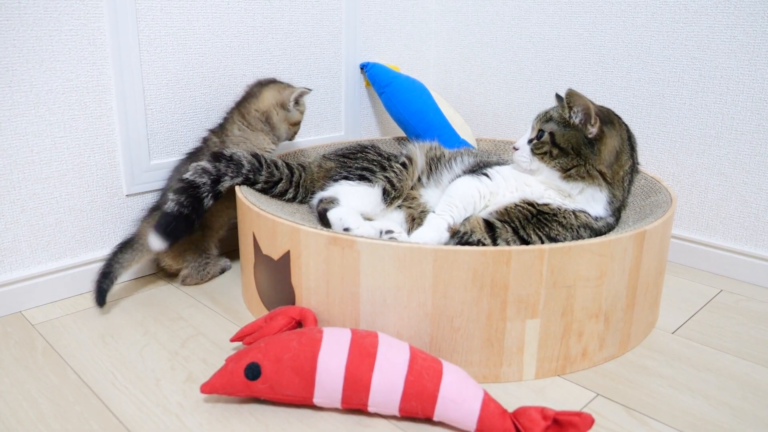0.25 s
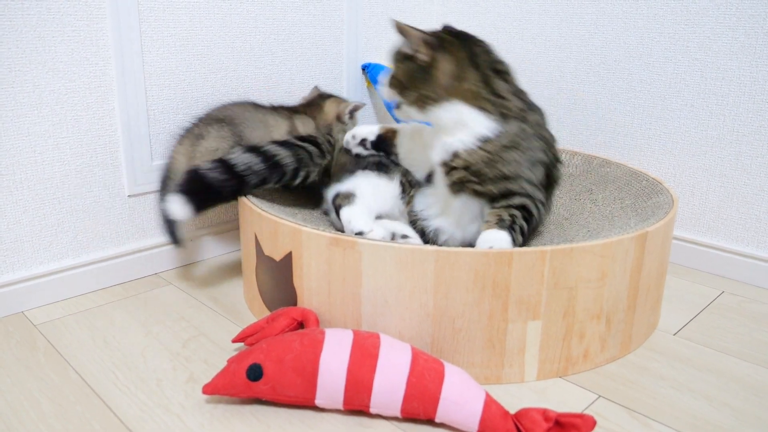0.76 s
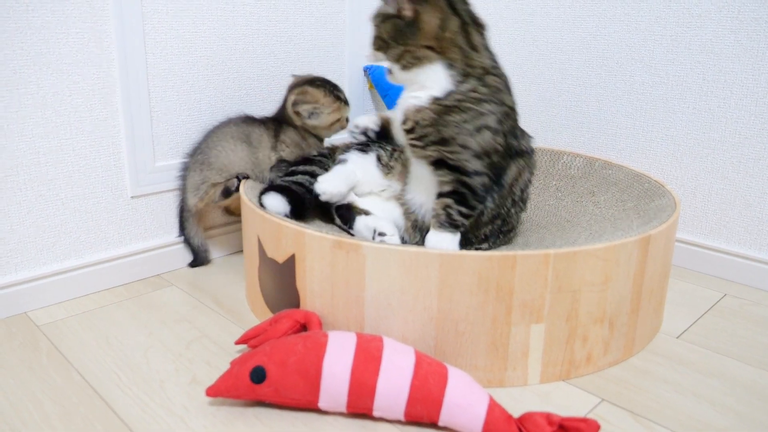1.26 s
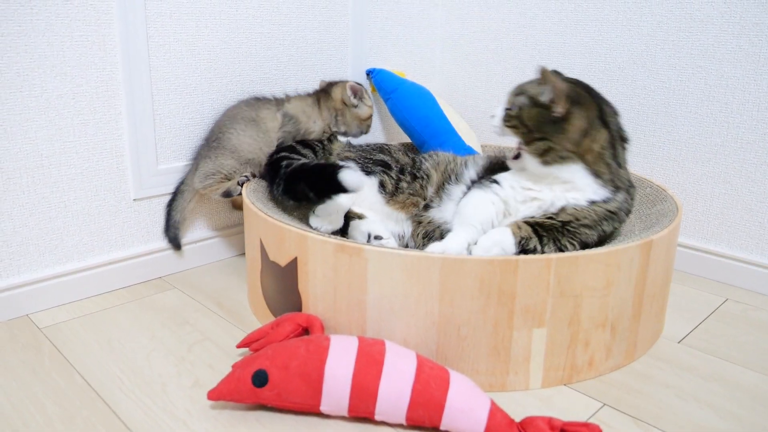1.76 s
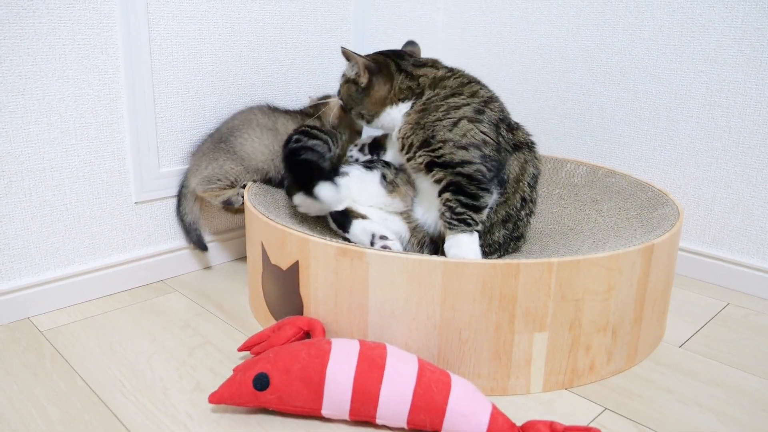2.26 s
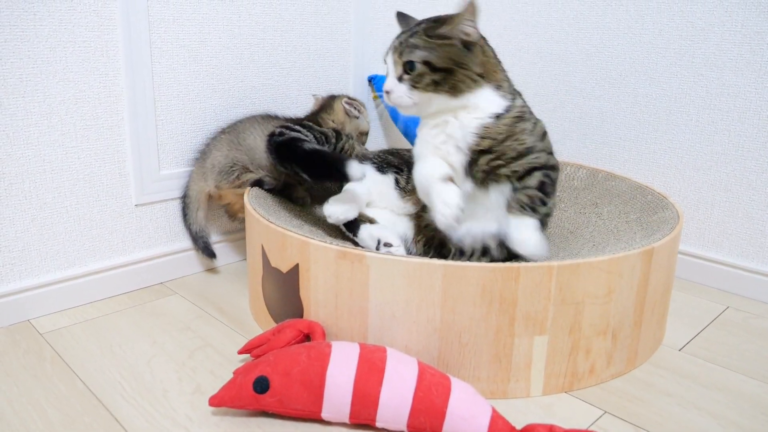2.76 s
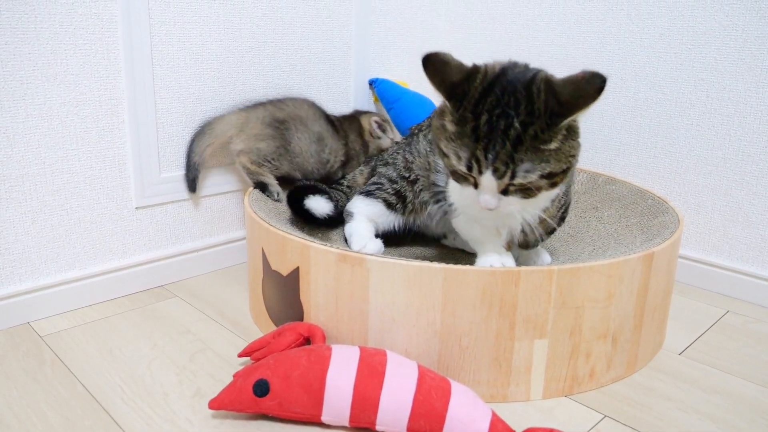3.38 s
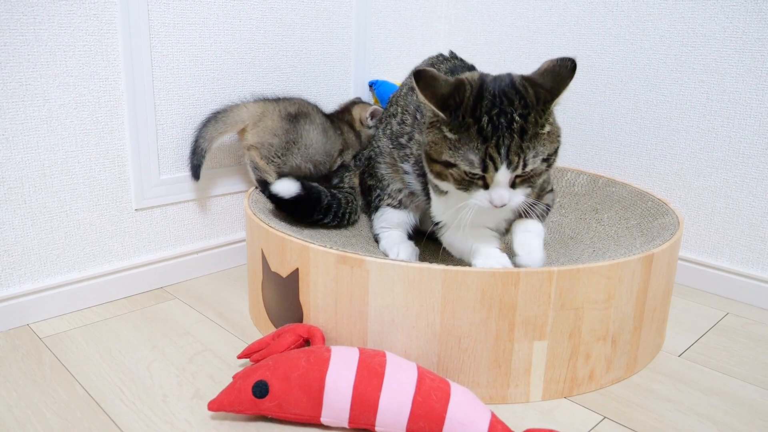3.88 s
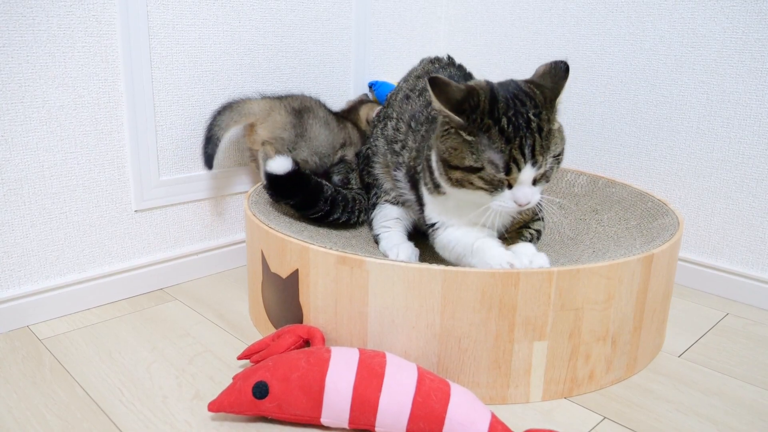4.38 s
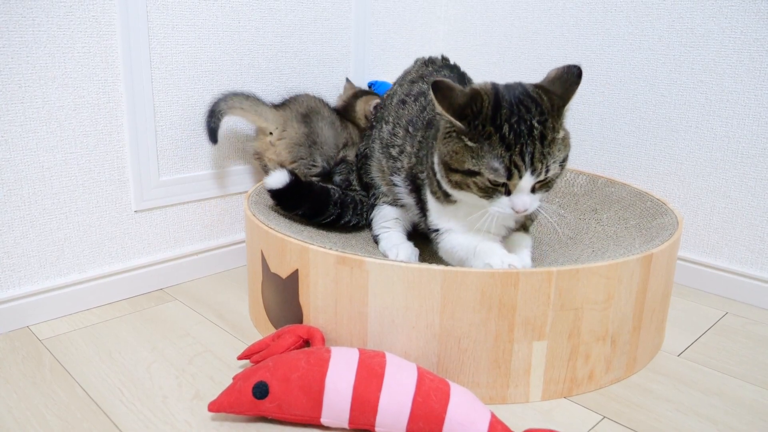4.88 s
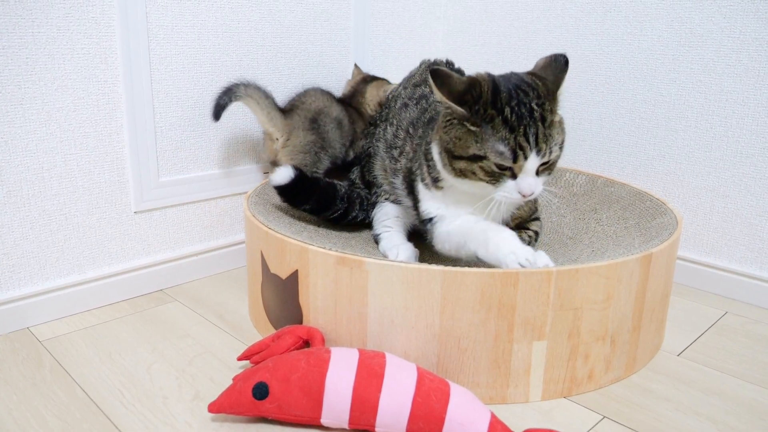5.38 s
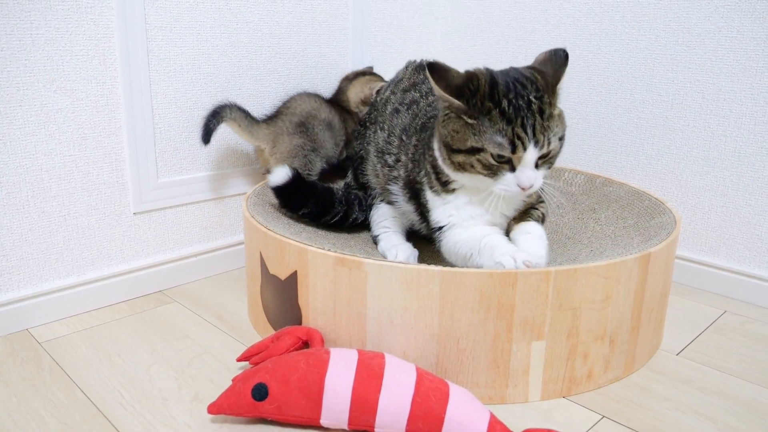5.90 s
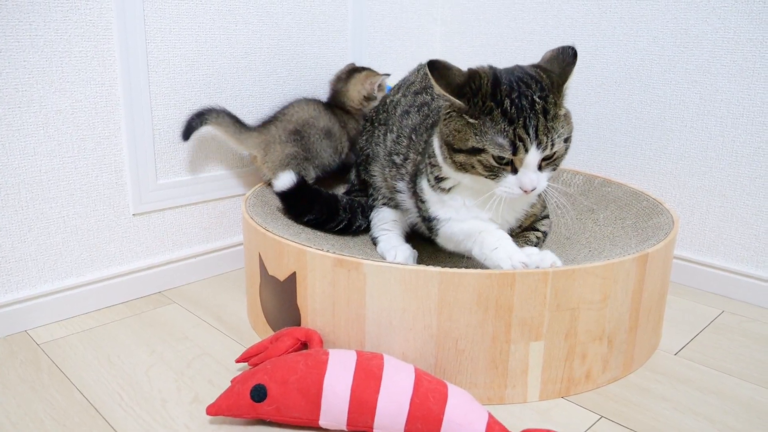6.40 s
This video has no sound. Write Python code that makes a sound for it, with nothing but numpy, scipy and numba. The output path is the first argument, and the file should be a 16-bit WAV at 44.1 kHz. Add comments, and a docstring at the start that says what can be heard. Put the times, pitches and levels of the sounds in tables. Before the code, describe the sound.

Two cats scuffle on a hollow cardboard scratcher: soft thuds, a rough strained cry, a wet hiss, a tiny mew, then harder claw rips.

```python
"""Faint room tone, then paws thudding and fur rustling: a kitten and a grown cat tussle on a round
cardboard scratching bed in a small, bare room. A rough cry breaks into spitting puffs; a wet hiss, a tiny mew follow.
Then claws snag harder: fibres tear as filtered noise, and the hollow bed rings as damped modes.
Voices are harmonics and noise through moving resonances; dense noise tails make the echoes."""
import sys
import numpy as np
from scipy import signal
from scipy.fft import rfft, irfft
from scipy.io import wavfile
from scipy.ndimage import uniform_filter1d
from numba import njit

SR = 44100
rng = np.random.default_rng(int(sys.argv[2]) if len(sys.argv) > 2 else 0)


def master(y):
    """Save y as 16-bit WAV."""
    cut = np.clip(np.atleast_2d(y).T, -1, 1)
    pcm = np.round(cut * 32767)  # scale
    wavfile.write(sys.argv[1], SR, pcm.astype(np.int16))


N = 293265
TIME = np.arange(N) / SR

# Table levels are before the trims that their functions add.
# spectrum of the still air: hz, level_db
AIR_SPECTRUM = [(18, -103), (30, -58), (64, -25), (102, -1), (129, -17), (304, -11.5), (337, -22.5),
                (374, -17), (437, -15.5), (794, -15.5), (2130, -26.5), (3230, -28), (3780, -35),
                (12200, -39), (15000, -40)]
AIR_DB = -70
# the room's answer by band: hz, t60_s, echo_db, side_over_mid_db
ROOM_BANDS = [(108, 0.46, -6.5, -35), (254, 0.31, 3.5, -24.5), (645, 0.41, 2, -13.5), (1800, 0.5, -5, -4),
              (4430, 0.49, -1, -6), (12000, 0.34, -1, -5)]

# bodies sliding on the cardboard: peak_s, rise_s, fall_s, rub_db, fur_db
SLIDES = [(0.725, 0.058, 0.051, -58, -61.5), (0.85, 0.031, 0.18, -67, -69.5), (1.04, 0.045, 0.05, -58, -61),
          (1.232, 0.042, 0.18, -59, -88), (1.63, 0.028, 0.1, -66, -71.5), (2.14, 0.13, 0.32, -55, -57),
          (3.12, 0.26, 0.12, -65, -70), (3.59, 0.12, 0.05, -67, -71.5), (3.85, 0.053, 0.022, -65, -92),
          (4.38, 0.2, 0.026, -59, -69)]
# spectra of fur crackle and of dull rubbing: hz, level_db
FUR_SPECTRUM = [(700, 1.5), (1500, 15.5), (2800, 6.5), (4500, -0.5), (6500, 1), (9000, -0.5), (12000, -7),
                (15000, -5)]
RUB_SPECTRUM = [(70, -66.5), (150, 7), (300, -0.5), (550, 2), (900, 2), (1600, -23), (3500, -51.5)]
# the cats are never quite still
STIR_FROM_S, STIR_RUB_DB, STIR_FUR_DB, STIR_UNEVEN_DB = 0.65, -69.5, -76.5, 3

# paw falls: start_s, thump_db, knock_db, bed_pitch_ratio
PAW_FALLS = [(0.646, -50, -52, 1.8), (0.704, -44.5, -64, 0.74), (0.762, -37, -51.5, 0.9),
             (0.824, -46, -54.5, 1.13), (1.226, -55, -64, 1.4), (1.331, -53, -66, 1.6),
             (1.586, -46.5, -80, 0.59), (1.659, -53, -59, 0.85), (1.78, -48, -76, 0.87),
             (2.859, -44, -58.5, 1.1), (2.92, -54, -57.5, 0.62), (3.08, -47.5, -50, 1.38),
             (3.16, -44.5, -76, 1.12), (3.227, -51.5, -76, 1.2), (3.571, -52, -56, 1.33),
             (3.744, -54, -55, 1.28), (3.827, -44.5, -55.5, 1.24), (4.233, -44, -47.5, 1.28),
             (4.752, -45, -46, 0.86), (5.67, -40, -43, 1.06), (6.275, -48, -78, 1.33),
             (6.521, -38.5, -34.5, 0.74)]
# light claw-tip ticks on the ribs: start_s, level_db, pitch_ratio
CLAW_TICKS = [(0.647, -64, 0.53), (1.007, -54, 1.1), (2.982, -58, 0.51), (3.079, -57, 0.5),
              (3.41, -64, 1.07), (3.478, -65, 0.82), (3.571, -77, 0.57), (3.744, -57.5, 0.85),
              (3.836, -70, 1.1), (3.895, -65, 0.8), (4.234, -52.5, 0.65), (5.31, -46, 0.58)]

# wet smacks of the mouth: start_s, level_db
SMACKS = [(2.853, -53.5), (2.869, -57.5)]
# modes of a smack: hz, level_db, t60_s
SMACK_MODES = [(1230, 10, 0.012), (1520, -25, .014), (3900, 1, 0.018), (7400, 13, 0.0064)]
# faint thin squeaks: start_s, length_s, centre_hz, level_db
SQUEAKS = [(5.484, 0.087, 3605, -77), (5.946, 0.075, 2214, -68.5), (6.425, 0.086, 3120, -72.5)]

# closed-mouth mew: time_s, pitch_hz, level_db
MEW_CONTOUR = [(2.566, 291.4, -72), (2.577, 382, -53), (2.587, 464, -46.5), (2.594, 496, -45),
               (2.602, 424, -48), (2.612, 334, -84)]
# harmonics of the mew, from the fundamental up: level_db
MEW_HARMONICS = [2.5, 0.5, -21, -34]

# the hiss: time_s, throat_db, teeth_db, jaw_hz, tongue_hz, tongue_db
HISS_CONTOUR = [(1.77, -75, -73, 930, 2460, -15), (1.94, -56, -65, 1060, 2480, -21),
                (2.03, -52, -59, 1110, 2570, -2), (2.1, -58.5, -63.5, 1140, 2920, 13),
                (2.16, -57.5, -55.5, 1170, 2900, 10), (2.26, -63.5, -65, 740, 1830, 17.5),
                (2.35, -57, -56, 700, 2160, 12), (2.41, -67.5, -65, 746, 2450, 20),
                (2.46, -65.5, -76, 890, 2850, 21.5), (2.52, -70, -62, 1000, 3400, 8),
                (2.6, -72, -70.5, 1000, 3270, 13)]
# whistly hiss resonances at palate, tooth edge and tooth gap:
# time_s, palate_hz, palate_db, edge_hz, edge_db, gap_hz, gap_db
HISS_WHISTLES = [(1.8, 4100, -7, 6550, 5, 9250, 10), (1.95, 4600, -12, 7000, -2, 10200, -4),
                 (2.06, 4700, -3, 6800, 0, 9850, 6), (2.15, 3400, -11, 8240, 7, 10000, 13),
                 (2.24, 3500, -1, 7260, -11, 9300, -1), (2.3, 3900, 4, 5440, -4, 8100, -8),
                 (2.37, 3940, -3, 6040, 6, 7500, 1), (2.44, 4020, 5, 6200, 3, 7300, -8),
                 (2.51, 5170, 3, 7300, -5, 11100, 11), (2.58, 4600, 3, 7100, -2, 9800, -2)]
# spectra of air in the throat and at the teeth: hz, level_db
THROAT_SPECTRUM = [(300, -30), (700, -4.5), (1300, 4), (1900, -4.5), (2900, -8.5), (3800, -20), (5000, -44),
                   (8000, -16.5)]
TEETH_SPECTRUM = [(2500, -5.5), (3400, 4.5), (4300, 0.5), (5100, 0.5), (5900, -2), (7500, 0), (8700, -9),
                  (9900, -15), (11000, -15), (15000, -5)]

# effort of the cry: time_s, level_db
CRY_EFFORT = [(1.004, -64), (1.043, -47), (1.076, -56), (1.1, -42.5), (1.13, -41), (1.158, -38),
              (1.195, -39.5), (1.236, -31.5), (1.248, -44), (1.264, -40.5), (1.279, -32), (1.305, -39.5),
              (1.332, -45.5), (1.36, -31.5), (1.376, -29.5), (1.39, -37), (1.41, -41.5), (1.418, -38),
              (1.44, -50)]
# melody of the cry: time_s, pitch_hz
CRY_PITCH = [(1.004, 540), (1.045, 492.4), (1.06, 527), (1.08, 470.4), (1.098, 501.5), (1.121, 455),
             (1.143, 497.2), (1.161, 477.2), (1.18, 544.3), (1.198, 479.3), (1.217, 536.2), (1.24, 487),
             (1.263, 449), (1.278, 484.6), (1.308, 544.5), (1.332, 461), (1.348, 516.7), (1.366, 475),
             (1.38, 495.8), (1.394, 449.4), (1.408, 494), (1.435, 455)]
# mouth shape of the cry: time_s, low_hz, mid_hz, mid_over_low_db, top_hz, top_over_low_db
CRY_MOUTH = [(1.04, 1800, 2740, -4, 3000, -29), (1.08, 1770, 2720, 2, 2980, -30),
             (1.118, 1700, 2650, 8, 3100, -21), (1.155, 1850, 2770, 1.5, 3340, -6.5),
             (1.2, 1700, 2740, -11, 3800, -6.5), (1.24, 1480, 2400, -34, 4000, -17),
             (1.26, 1480, 2280, -5, 4100, 7), (1.283, 1520, 2380, 17, 4030, 0.5),
             (1.325, 1370, 2310, 13.5, 3370, -10), (1.365, 1940, 2270, 14.5, 3460, -1),
             (1.388, 1840, 2600, 13, 3660, 7), (1.405, 1370, 2470, 9.5, 3630, -1),
             (1.42, 1390, 2380, 13.5, 3450, -8)]
# roughness of the cry: time_s, pitch_jitter_share, rasp_0_to_1
CRY_ROUGHNESS = [(1.03, .03, .55), (1.1, .01, .22), (1.24, .01, .17), (1.28, .018, .34), (1.32, .035, .6),
                 (1.365, .012, .27), (1.39, .025, .5), (1.42, .02, .35)]
# spectra of the voice before the mouth, and of what passes beside its resonances: hz, level_db
CRY_FOLDS_SPECTRUM = [(200, -1.5), (480, 3), (1000, 3.5), (2000, 2.5), (3000, 0.5), (4200, -11),
                      (5200, -24), (9000, -12)]
CRY_THROAT_SPECTRUM = [(250, -32), (500, -4.5), (1000, 4), (2000, 3), (3000, -28), (3600, -12), (6000, -5),
                       (12000, -18)]
# spectrum of leaking air: hz, level_db
SPIT_SPECTRUM = [(900, -24), (2000, -7), (2250, 0), (2400, 9), (2560, -1), (2900, 1), (3900, -8),
                 (6000, -13.5), (8000, -23), (13000, -39)]
SPIT_DB = -21  # relative to the effort of the voice
# spitting puffs that break off the cry: peak_s, rise_s, fall_s, level_db
PUFFS = [(1.261, 0.014, 0.0081, -54.5), (1.473, 0.029, 0.037, -49.5)]

# claw snags: start_s, snap_db, thump_db, wall_flex_db, pad_knock_db, rim_clack_db, tear_db,
# snap_centre_hz, pad_pitch_ratio, pad_ring_ratio
SNAGS = [(0.658, -74, -66, -59, -51.5, -65, -79, 1300, 1, 0.62),
         (2.234, -54, -59, -51.5, -52, -64, -72, 1390, 1.27, 1),
         (4.104, -40, -51, -48.5, -40.5, -40, -46.5, 1700, 0.88, 1.1),
         (4.341, -54, -60, -56.5, -43.5, -69, -48.5, 1800, 1.02, 0.54),
         (4.739, -57, -50, -49.5, -45, -64, -59, 1290, 0.91, 1.1),
         (4.9013, -33, -34.5, -41, -29, -55, -42.5, 1430, 0.98, 1.03),
         (5.142, -56, -57, -65, -55, -68, -55, 1410, 0.94, 0.76),
         (5.279, -39, -42, -41.5, -33.5, -37.5, -50, 1830, 1.03, 1.1),
         (5.31, -67, -45.5, -64, -37.5, -48, -73, 1300, 0.89, 0.93),
         (5.558, -38.5, -56, -65, -40.5, -54, -48.5, 2320, 1.07, 0.7),
         (5.59, -49.5, -58, -54, -48, -52, -50.5, 1760, 0.91, 1.3),
         (5.679, -43.5, -43.5, -41, -32.5, -51, -41, 1580, 0.91, 0.64),
         (5.85, -40, -37, -50, -31, -44, -49, 1590, .99, 1.4),
         (6.1229, -33.5, -54, -53.5, -43.5, -42, -44, 1850, 0.97, 0.86),
         (6.2977, -41.5, -37.5, -56, -37.5, -46, -36.5, 1700, 1, 0.58),
         (6.5003, -25, -33.5, -41, -32.5, -34.5, -34, 2030, 0.87, 0.93),
         (6.5121, -24, -34.5, -38.5, -32, -36, -26, 1860, 1.18, 0.6),
         (6.525, -41, -35.5, -44.5, -39, -54, -39, 1300, 0.93, 0.69)]
# modes of the hollow bed, wall, rim, pad on the bed, and paper ribs: hz, level_db, t60_s
BED_MODES = [(119.8, -2, 0.18), (156.2, 12, 0.058), (177, -7.5, 0.13)]
WALL_MODES = [(256, -6, 0.034), (425, -11, 0.025)]
RIM_MODES = [(630, -8.5, 0.028), (930, -3.5, 0.032)]
PAD_MODES = [(360, -37, 0.024), (481, -16, 0.15), (553.4, 17, 0.032), (624, -41, 0.069), (786, -7.5, 0.13)]
RIB_MODES = [(1316, 8, 0.018), (1620, 13.5, 0.0093), (2015, 4.5, 0.012), (2380, -0.5, 0.0085),
             (2540, -4.5, 0.014), (3950, -15, 0.01)]
# spectrum of tearing fibres: hz, level_db
FIBRE_SPECTRUM = [(600, -46.5), (2000, 4), (4200, 3.5), (5600, 0), (8500, -1.5), (10500, -3.5),
                  (13000, -16), (15500, 7.5)]
# a strong snag; the slip time halves for every SLIP_HALVES_DB of louder snap
SNAP_DB, SLIP_S, SLIP_HALVES_DB = -28, 0.00086, 18
# claws drag on after each snag: levels after a strong snag, dB gained per dB of snap, timing of the swell
DRAG_RUB_DB, DRAG_FUR_DB, DRAG_FOLLOWS = -51, -66, 0.45
DRAG_LAG_S, DRAG_RISE_S, DRAG_FALL_S = 0.0075, 0.011, 0.11
RIB_TOP_HZ = 2900  # the ribs radiate little above this
TOP_HZ = 15300  # steep upper limit of the recorder


def undb(db):
    """Decibels to gain."""
    return 10 ** (np.asarray(db) / 20)


def unit(x):
    """Scale to rms 1."""
    return x / np.sqrt(np.mean(x ** 2))


def curves(rows):
    """Every column of a timed table, sample by sample."""
    s, *columns = np.transpose(rows)
    return [np.interp(TIME, s, c) for c in columns]


def during(rows):
    """A soft gate, open while a table lasts."""
    is_open = (TIME > rows[0][0]) & (TIME < rows[-1][0])
    return uniform_filter1d(1. * is_open, size=300)


def over_hz(rows, size):
    """Every column of a spectral table on the bins of a transform, along log frequency."""
    hz, *columns = np.transpose(rows)
    bins = np.log(np.fft.rfftfreq(size, 1 / SR) + 1)
    return [np.interp(bins, np.log(hz), c) for c in columns]


def colour(x, points):
    """Causal minimum-phase filter with the given spectrum."""
    size = 8192
    cepstrum = irfft(np.log(undb(over_hz(points, size)[0])))
    # folding the cepstrum forward puts the response after its cause
    cepstrum[1:size // 2] *= 2
    cepstrum[size // 2 + 1:] = 0
    response = irfft(np.exp(rfft(cepstrum)))
    return signal.fftconvolve(x, response)[:len(x)]


def noise(points, grain_db=0):
    """Coloured noise of rms 1; uneven sizes, held for 16 samples each, make it grainy."""
    grains = np.minimum(rng.exponential(size=N // 16 + 1), 4)
    sizes = np.repeat(undb(grain_db * grains), 16)[:N]
    return unit(colour(rng.standard_normal(N) * sizes, points))


def walk(rate_hz):
    """Random wander of rms 1, joining this many random points per second."""
    return unit(np.interp(TIME * rate_hz, np.arange(N), rng.standard_normal(N)))


def pops(per_s):
    """Sparse random impulses of uneven size; rms 1."""
    return unit((rng.random(N) < per_s / SR) * rng.standard_normal(N))


def swell(s, rise_s, fall_s):
    """A rounded rise to 1 and a rounded fall."""
    return np.exp(-((TIME - s) / np.where(TIME < s, rise_s, fall_s)) ** 2)


def push(rise_s):
    """A contact force that swells and lets go."""
    t = TIME[:SR // 5] / rise_s
    return t * np.exp(-t)


@njit
def resonate(x, hz, width_hz):
    """Band-pass with a moving centre."""
    y, band, low = np.empty(len(x)), 0., 0.
    for i in range(len(x)):
        g, k = np.tan(np.pi * hz[i] / SR), width_hz / hz[i]
        v = (band + g * (x[i] - low)) / (1 + g * (g + k))
        band, low, y[i] = 2 * v - band, low + 2 * g * v, k * v
    return y


def ring(force, modes):
    """Damped modes driven by a force."""
    t = TIME[:len(force)]
    response = sum(undb(db - 60 * t / t60) * np.cos(2 * np.pi * hz * t) for hz, db, t60 in modes)
    return signal.fftconvolve(force, response)[:len(force)]


def retune(modes, pitch, ring_time=1):
    """Scale the pitch and ring time of the modes, with a little random scatter in pitch and level."""
    scatter, scatter_db = 0.018, 1.5
    return [(hz * pitch * (1 + scatter * rng.standard_normal()),
             db + scatter_db * rng.standard_normal(),
             t60 * ring_time) for hz, db, t60 in modes]


def add(track, s, x, db):
    """Mix in a sound whose loudest 10 ms have the given level."""
    i = int(s * SR)
    x = x * undb(db) / np.sqrt(uniform_filter1d(x ** 2, size=441).max())
    track[i:i + len(x)] += x[:N - i]


def stereo(mid, side):
    """Mid and side to left and right."""
    return np.array([mid + side, mid - side])


def still_air(side_db=-84):
    """Room tone: faint, nearly steady coloured noise with a quieter independent side signal."""
    side = noise([(60, -5.0), (300, -9.5), (1000, -1.5), (3000, -6.0),
                  (6000, -12.5), (12000, -15), (14000, -32.0)])
    return stereo(noise(AIR_SPECTRUM) * undb(AIR_DB + .5 * walk(17)), side * undb(side_db))


def echoes(x, first_s=0.0035, build_s=0.00042):
    """Bare walls and a wooden floor answer with dense echoes; the bass stays central."""
    size = 32768
    t = np.maximum(TIME[:size] - first_s, 0)
    _, echo_db, side_db = over_hz(ROOM_BANDS, size)
    spectra = rfft(rng.standard_normal((2, size)))
    levels = undb([echo_db, echo_db + side_db])
    tails = 0
    for k, (_, t60, _, _) in enumerate(ROOM_BANDS):
        # neighbouring bands cross-fade along frequency
        band = over_hz([(row[0], j == k) for j, row in enumerate(ROOM_BANDS)], size)[0]
        decay = undb(-60 * t / t60) * (1 - np.exp(-t / build_s))
        tails = tails + irfft(spectra * band * levels) * decay / np.linalg.norm(decay)
    return signal.fftconvolve(x[None], stereo(*tails), axes=1)[:, :N]


def drag():
    """How hard the claws drag on after their snags; the swell of a snag at SNAP_DB peaks at 1."""
    return sum(undb(DRAG_FOLLOWS * (snap - SNAP_DB)) * swell(s + DRAG_LAG_S, DRAG_RISE_S, DRAG_FALL_S)
               for s, snap, *_ in SNAGS)


def rustle(rub_db=-4, fur_db=-2):
    """Fur and paws brush the ribs as cats slide and claws drag: a dull rubbing and a fine crackle."""
    stir = (TIME > STIR_FROM_S) * undb(STIR_UNEVEN_DB * walk(14))
    moves = [(swell(*shape), rub, fur) for *shape, rub, fur in SLIDES]
    moves += [(drag(), DRAG_RUB_DB, DRAG_FUR_DB), (stir, STIR_RUB_DB, STIR_FUR_DB)]
    # separate movements add as powers
    rub, fur = np.sqrt(sum(np.outer(undb(levels), shape) ** 2 for shape, *levels in moves))
    rubbing = noise(RUB_SPECTRUM, grain_db=3) * undb(2.5 * walk(45))
    crackle = noise(FUR_SPECTRUM, grain_db=3) * undb(1.5 * walk(45))
    return rubbing * rub * undb(rub_db) + crackle * fur * undb(fur_db)


def paws(thump_db=-5, knock_db=-2, ribs_db=-13, soft_hz=1700):
    """Soft pads land on the bed and scuff it and its ribs; their fur muffles the contact."""
    out = np.zeros(N)
    for s, thump, knock, pitch in PAW_FALLS:
        scuff = push(0.0017)
        scuff = scuff * rng.standard_normal(len(scuff))
        bed = [(hz * pitch, db, t60) for hz, db, t60 in BED_MODES]
        add(out, s, ring(push(0.00084), bed), thump + thump_db)
        add(out, s, ring(scuff, PAD_MODES), knock + knock_db)
        add(out, s, ring(scuff, RIB_MODES), knock + ribs_db)
    return signal.sosfilt(signal.butter(2, soft_hz, fs=SR, output="sos"), out)


def ticks(tick_db=-3, fibres_db=-14, contact_s=0.00094):
    """A claw tip touches a rib and scrapes a fibre or two."""
    out = np.zeros(N)
    for s, db, pitch in CLAW_TICKS:
        touch = push(contact_s)
        touch = touch * rng.standard_normal(len(touch))
        add(out, s, ring(touch, retune(RIB_MODES, pitch)), db + tick_db)
        add(out, s, colour(touch, FIBRE_SPECTRUM), db + fibres_db)
    return out


def small_sounds(rise_share=0.023):
    """Mouth smacks ring briefly; thin sine squeaks swell and glide up a little."""
    out = np.zeros(N)
    for s, db in SMACKS:
        add(out, s, ring(push(.00005), SMACK_MODES), db)
    for s, length_s, hz, db in SQUEAKS:
        envelope = np.hanning(int(length_s * SR))
        glide_hz = hz * (1 + rise_share * np.linspace(-.5, .5, len(envelope)))
        add(out, s, envelope * np.sin(2 * np.pi * np.cumsum(glide_hz) / SR), db)
    return out


def mew():
    """A very short, dark, gruff note: a few jittering harmonics whose pitch rises and falls."""
    pitch, db = curves(MEW_CONTOUR)
    phase = 2 * np.pi * np.cumsum(pitch * (1 + .03 * walk(500))) / SR
    voice = sum(undb(h) * np.sin((k + 1) * phase) for k, h in enumerate(MEW_HARMONICS))
    gruff = undb(2.5 * walk(450))
    return unit(voice * gruff) * undb(db) * during(MEW_CONTOUR)


def hiss(throat_db=-1.5, teeth_db=-2.0, spittle_db=-6, jaw_db=4, whistles_db=2):
    """Turbulent, wet air sputters through the trembling mouth; its resonances shift as the lips draw back."""
    throat, teeth, jaw_hz, tongue_hz, tongue_db = curves(HISS_CONTOUR)
    palate_hz, palate_db, edge_hz, edge_db, gap_hz, gap_db = curves(HISS_WHISTLES)
    wet_db, sputter_db = 2.8, 2.2
    air = noise(THROAT_SPECTRUM, wet_db) * undb(throat + throat_db)
    air = air + noise(TEETH_SPECTRUM, wet_db) * undb(teeth + teeth_db)
    spittle = unit(colour(pops(170), THROAT_SPECTRUM)) * undb(throat + spittle_db)
    spittle = spittle + unit(colour(pops(170), TEETH_SPECTRUM)) * undb(teeth + spittle_db)
    air = (air + spittle) * undb(sputter_db * walk(90))
    # centre_hz, width_hz, level_db
    resonances = [(jaw_hz, 380., jaw_db),
                  (tongue_hz, 280., tongue_db),
                  (palate_hz, 350., palate_db + whistles_db),
                  (edge_hz, 560., edge_db + whistles_db),
                  (gap_hz, 560., gap_db + whistles_db)]
    out = air
    for hz, width_hz, db in resonances:
        tremble, flutter_db = 1 + .02 * walk(30), 2.5 * walk(45)
        out = out + undb(db + flutter_db) * resonate(air, hz * tremble, width_hz)
    return out / 2 * during(HISS_CONTOUR)


def cry(open_db=-17, gain_db=-2.0, shimmer_db=2.5, catch_db=2.6):
    """Strained vocal folds catch and flutter; they and pulsed air sound through three moving resonances."""
    (pitch,), (db,) = curves(CRY_PITCH), curves(CRY_EFFORT)
    low_hz, mid_hz, mid_db, top_hz, top_db = curves(CRY_MOUTH)
    jitter, rasp = curves(CRY_ROUGHNESS)
    phase = 2 * np.pi * np.cumsum(pitch * (1 + jitter * walk(400))) / SR
    # the strained folds never close alike, so every overtone flutters on its own
    folds = unit(sum(np.cos(k * phase + k * k + .25 * walk(120)) * undb(shimmer_db * walk(90))
                     for k in range(1, 10)))
    pulsed_air = .7 * (1 + np.cos(phase)) * rng.standard_normal(N)
    sputter = pulsed_air + 2 * rasp * pops(500)
    source = colour(folds + rasp * sputter, CRY_FOLDS_SPECTRUM)
    voice = undb(open_db) * colour(source, CRY_THROAT_SPECTRUM)
    for hz, width_hz, share_db in [(low_hz, 620., 0), (mid_hz, 390., mid_db), (top_hz, 600., top_db)]:
        voice = voice + undb(share_db) * resonate(resonate(source, hz, width_hz), hz, width_hz)
    # even out the voice before the catches and the effort shape its loudness
    voice = voice / np.sqrt(uniform_filter1d(voice ** 2, size=500))
    catches = unit(undb(-catch_db * np.abs(walk(330)) ** 1.5))
    effort = undb(db + gain_db) * during(CRY_EFFORT)
    puffs = sum(undb(puff_db) * swell(*shape) for *shape, puff_db in PUFFS)
    spit = effort * undb(SPIT_DB) + puffs
    return voice * catches * effort + noise(SPIT_SPECTRUM) * spit


def scrape(ribs_db=-62, fibres_db=-69):
    """The dragging claw skips from rib to rib and breaks single fibres."""
    skips = pops(260)
    ribs = unit(ring(skips, RIB_MODES)) * undb(ribs_db)
    fibres = unit(colour(skips, FIBRE_SPECTRUM)) * undb(fibres_db)
    return (ribs + fibres) * drag()


def recoil(thump_db=1, knock_db=1, pad_lag_s=0.002243, bed_lag_s=0.0036, strain_db=-15, strain_s=0.00087):
    """The pad creaks as the claw pulls; freed, it springs back and shakes the rim, wall and hollow bed."""
    out = np.zeros(N)
    for s, _, thump, flex, knock, rim, _, _, pitch, ring_time in SNAGS:
        pad_s, bed_s = s + pad_lag_s, s + bed_lag_s
        pull = push(strain_s)[::-1]  # the push reversed in time: a slow build, then a quick release
        creak = ring(pull * rng.standard_normal(len(pull)), PAD_MODES)
        add(out, pad_s - len(pull) / SR, creak, knock + strain_db)
        add(out, pad_s, -ring(push(0.00024), retune(PAD_MODES, pitch, ring_time)), knock + knock_db)
        add(out, pad_s, -ring(push(0.00019), retune(RIM_MODES, 0.93)), rim)
        add(out, bed_s, ring(push(0.00032), retune(WALL_MODES, 0.99)), flex)
        add(out, bed_s, ring(push(0.00047), BED_MODES), thump + thump_db)
    return out


def rips(snap_db=-4, focus_db=2, focus_hz=900., crumble_db=-19, crumble_s=0.0032, grain_db=2):
    """A claw tears a few fibres and flicks the paper ribs; loosened fibres crumble after it."""
    out = np.zeros(N)
    soften = signal.butter(4, RIB_TOP_HZ, fs=SR, output="sos")
    for s, snap, *_, tear, centre_hz, _, _ in SNAGS:
        slip_s = SLIP_S * 2 ** ((SNAP_DB - snap) / SLIP_HALVES_DB)
        slip = push(slip_s) + undb(crumble_db) * push(crumble_s)
        grains = undb(grain_db * rng.exponential(size=len(slip)))
        cracks = slip * rng.standard_normal(len(slip)) * grains
        ribs = ring(cracks, retune(RIB_MODES, 0.94))
        ribs = ribs + undb(focus_db) * resonate(ribs, np.full(len(ribs), 1. * centre_hz), focus_hz)
        add(out, s, signal.sosfilt(soften, ribs), snap + snap_db)
        add(out, s, colour(cracks, FIBRE_SPECTRUM), tear)
    return out


def scene(patterns=3, rip_echo_db=-5, knock_echo_db=-4, cat_echo_db=-1, cry_echo_db=-3, mew_echo_db=-6,
          cry_left_db=2.0):
    """Cats and cardboard sound straight and from the walls; the cry comes from a little to the left."""
    cats, call = hiss() + small_sounds() + rustle(), cry()
    steps, croak = paws() + ticks() + scrape(), mew()
    # the echoes get a second draw of the knocks, with a quieter pad, for a diffuse tail
    knocks = steps + recoil(knock_db=-1.0, strain_db=-9)
    body = cats * undb(cat_echo_db) + call * undb(cry_echo_db)
    body = body + knocks * undb(knock_echo_db) + croak * undb(mew_echo_db)
    room = 0
    for k in range(patterns):
        # random echo patterns cross-fade, so that no single draw colours the room
        share = np.sqrt((1 + np.cos(2 * np.pi * (TIME / 1.15 - k / patterns))) / patterns)
        # fresh rips for each echo pattern keep the echoed crackle even and diffuse
        room = room + echoes(body * share + rips() * undb(rip_echo_db))
    placed_call = call * undb([[cry_left_db / 2], [-cry_left_db / 2]])
    return cats + placed_call + croak + steps + recoil() + rips() + room + still_air()


def record(dry, low_cut_hz=66, roll_off_hz=11800):
    """The microphone rolls off the deep bass and the top; the recorder cuts steeply above it."""
    band = signal.butter(4, [low_cut_hz, roll_off_hz], "band", fs=SR, output="sos")
    lean = signal.sosfilt(band, dry)
    return signal.sosfilt(signal.ellip(10, .2, 80, TOP_HZ, fs=SR, output="sos"), lean)


dry = scene()
out = record(dry)
master(out)
```